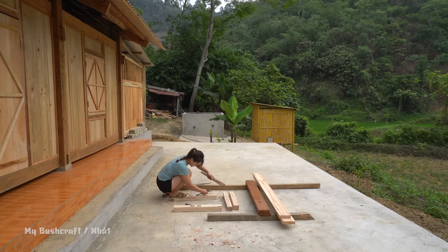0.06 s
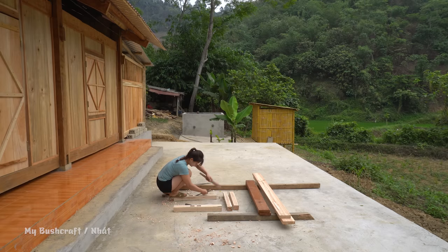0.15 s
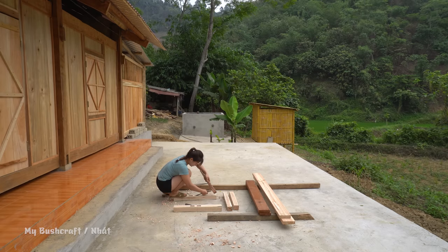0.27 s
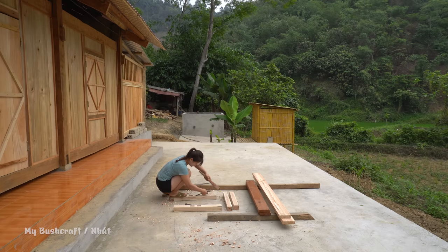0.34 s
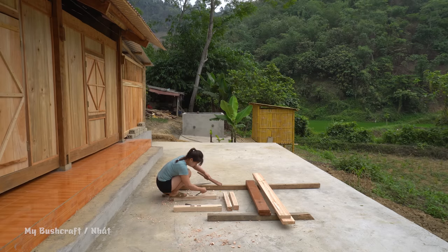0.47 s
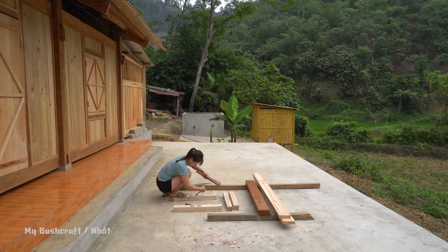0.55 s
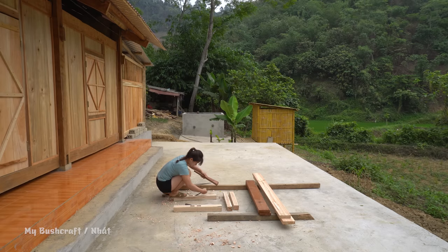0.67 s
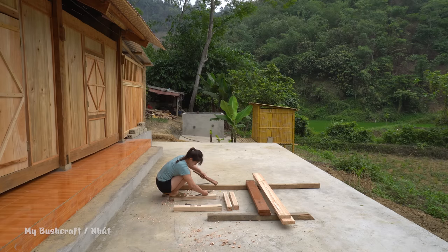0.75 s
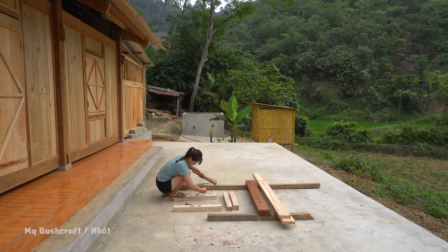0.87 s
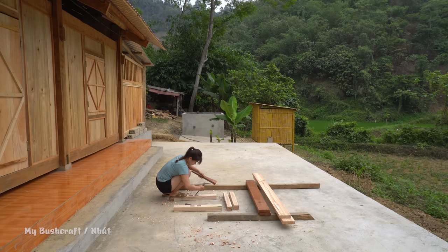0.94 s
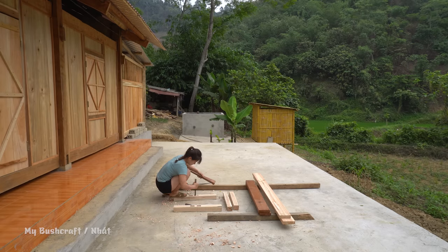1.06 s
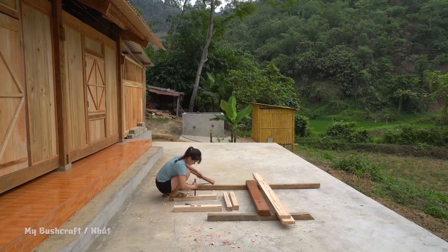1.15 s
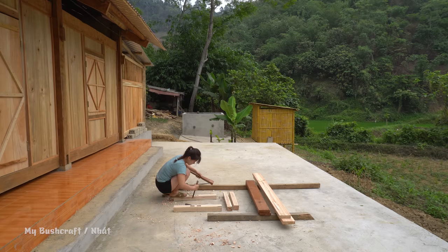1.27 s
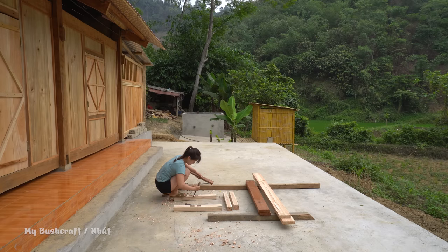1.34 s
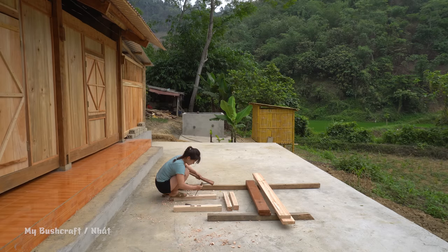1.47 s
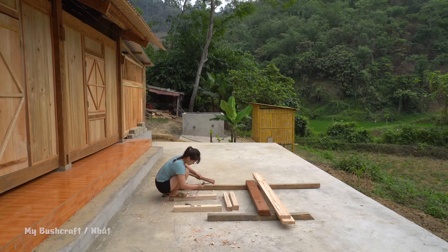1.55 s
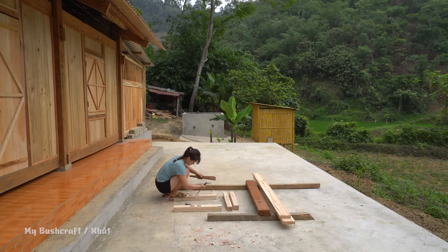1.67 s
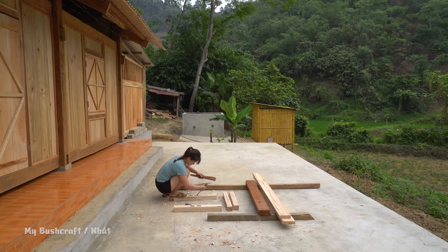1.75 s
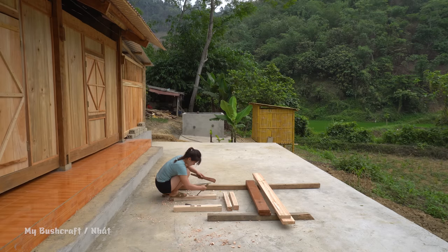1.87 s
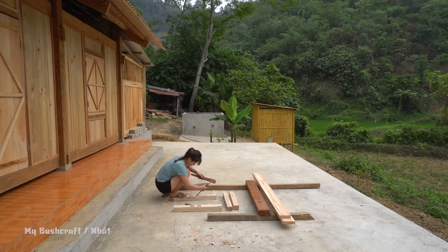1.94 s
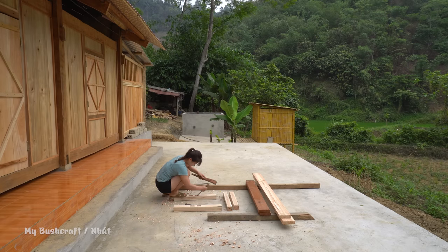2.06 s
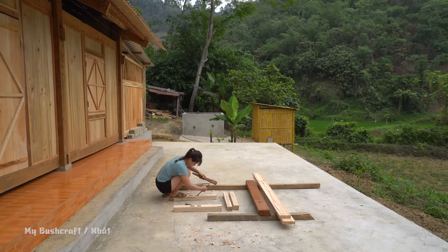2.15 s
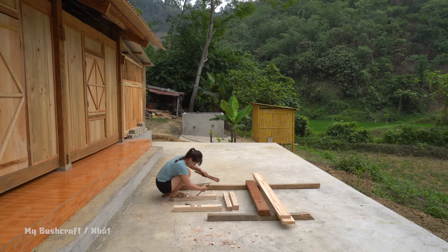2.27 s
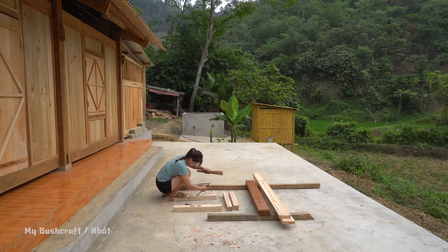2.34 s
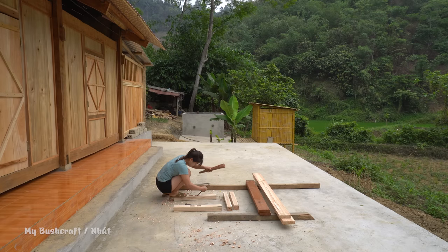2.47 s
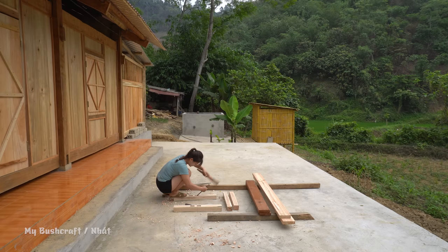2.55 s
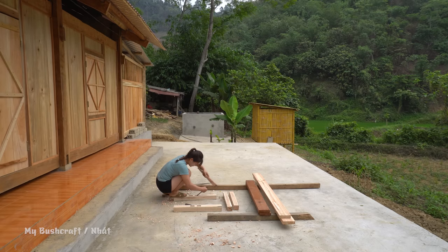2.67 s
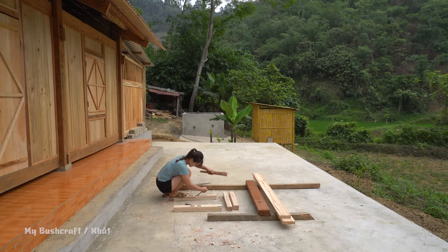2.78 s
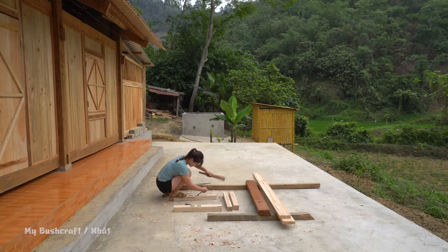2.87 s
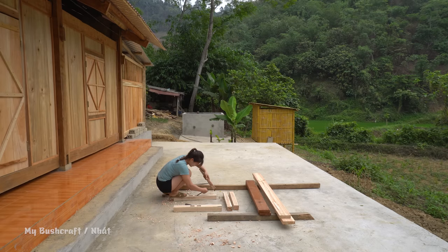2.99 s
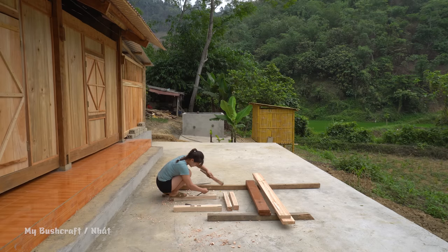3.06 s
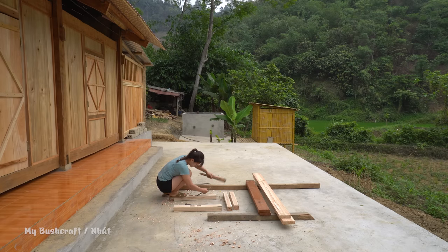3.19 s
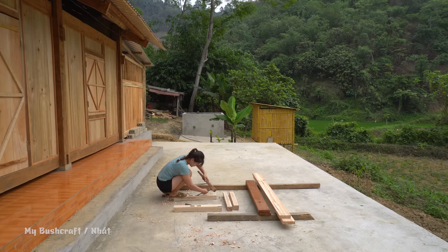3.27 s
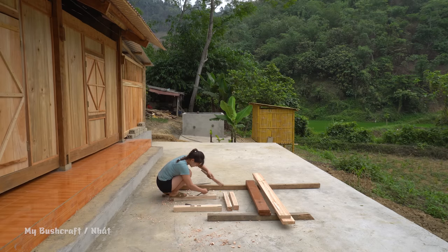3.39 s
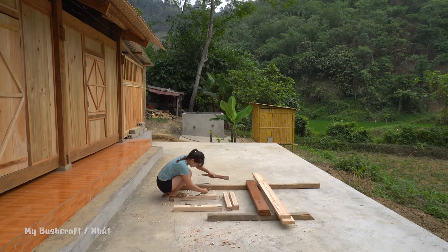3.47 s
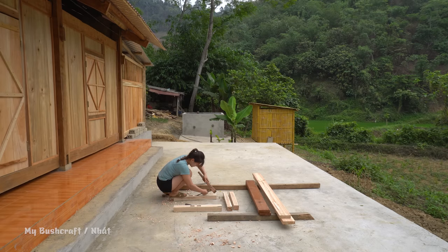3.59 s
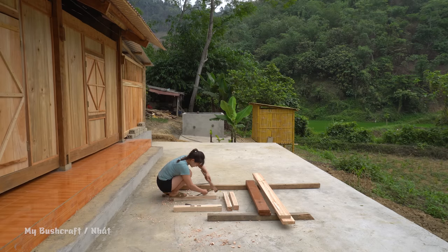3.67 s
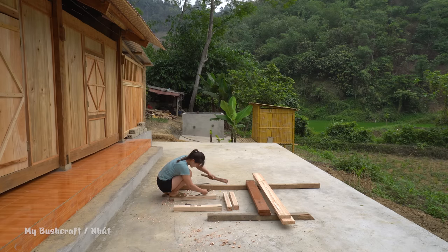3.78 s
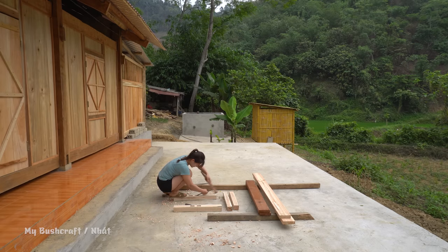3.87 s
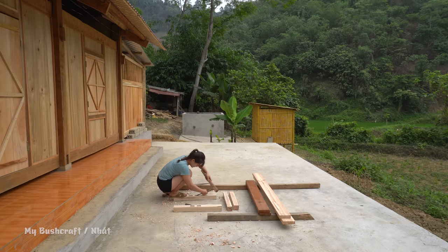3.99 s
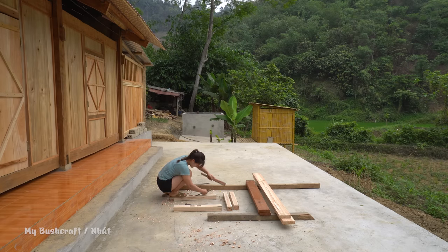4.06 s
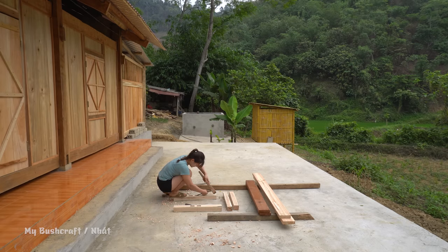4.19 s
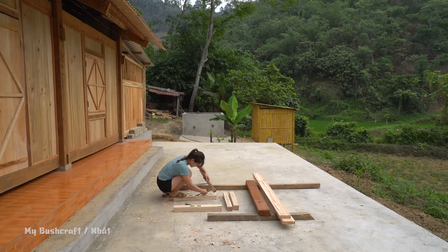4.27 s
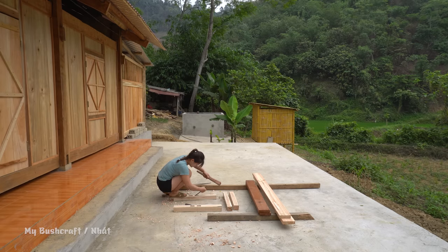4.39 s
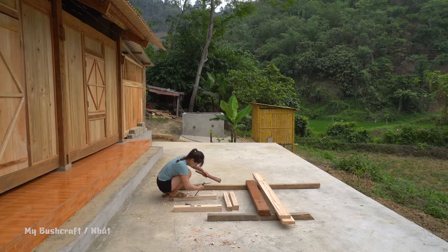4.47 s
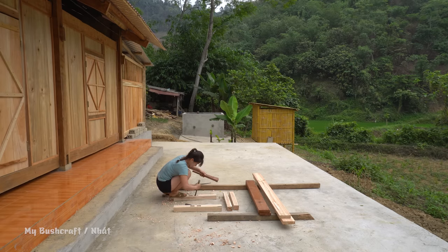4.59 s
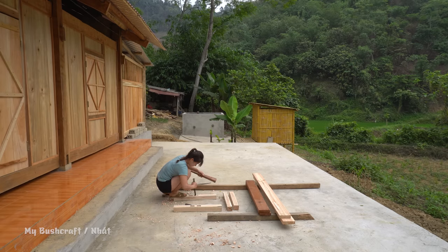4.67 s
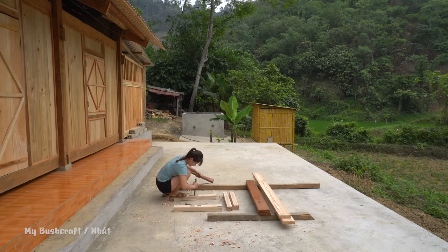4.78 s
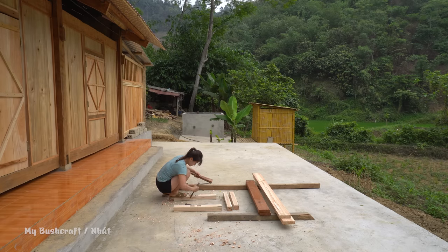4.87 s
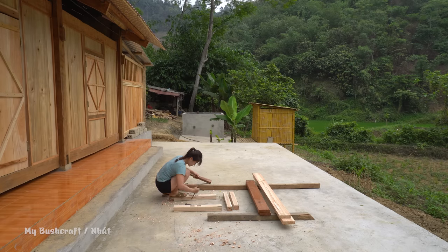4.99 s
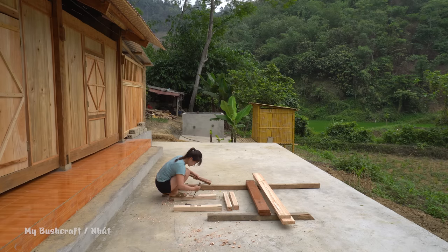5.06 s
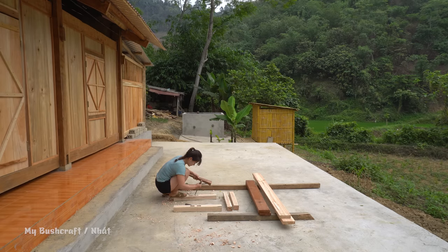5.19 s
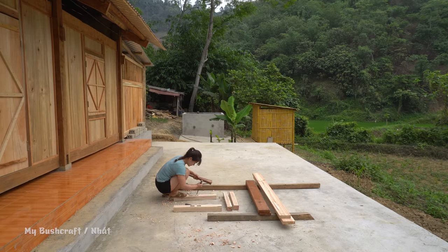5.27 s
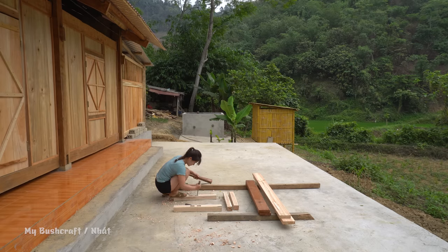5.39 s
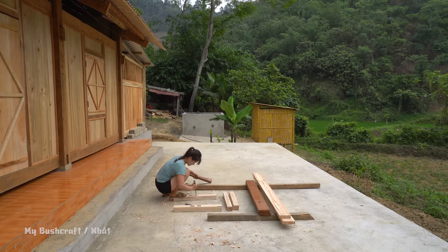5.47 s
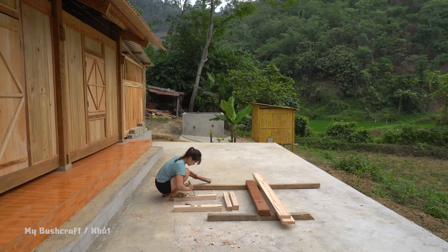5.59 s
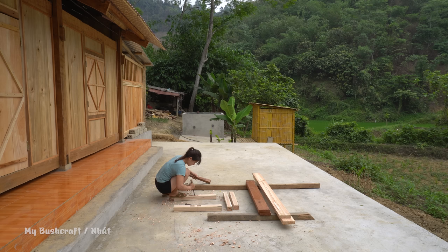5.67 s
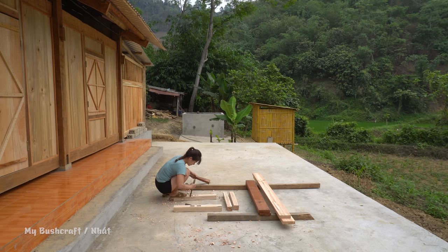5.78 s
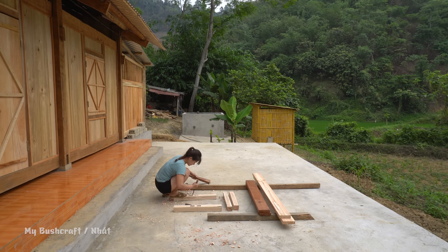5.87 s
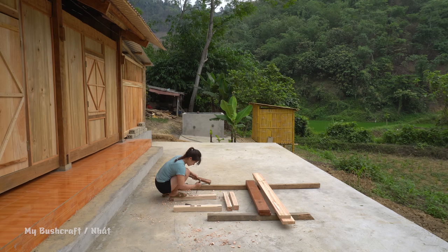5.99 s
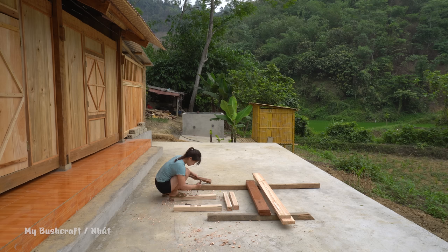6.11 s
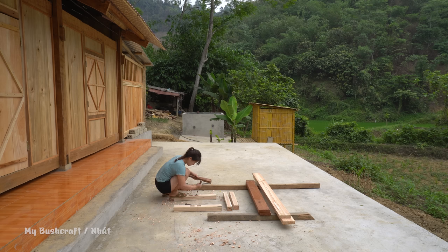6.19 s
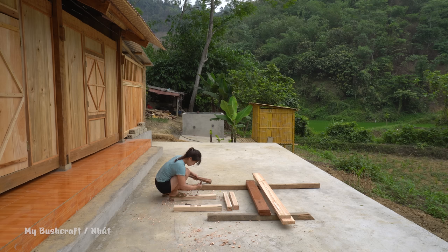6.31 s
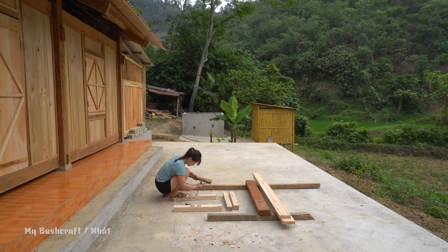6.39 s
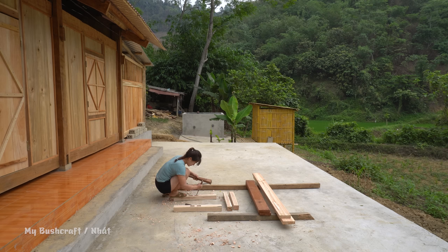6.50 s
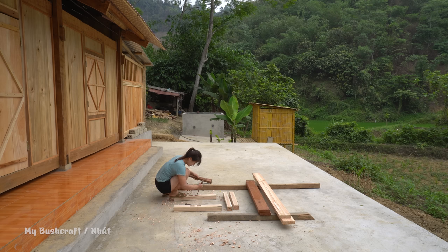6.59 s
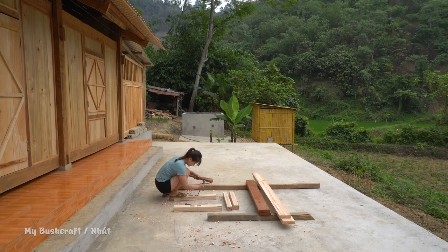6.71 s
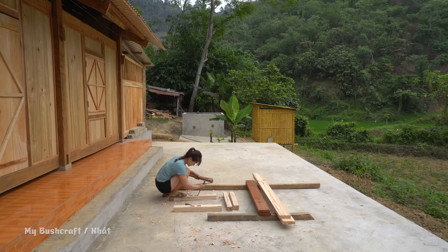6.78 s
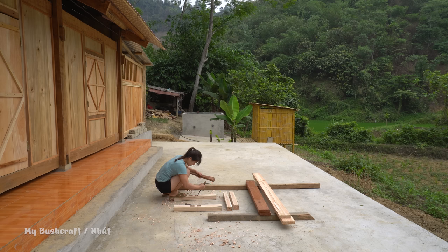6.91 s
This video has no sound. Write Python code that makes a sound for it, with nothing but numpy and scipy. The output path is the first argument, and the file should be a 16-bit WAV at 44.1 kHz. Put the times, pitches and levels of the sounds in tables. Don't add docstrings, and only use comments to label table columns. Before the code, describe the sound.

Bright woody chisel blows crack across a concrete yard, pausing for small knocks and ticks, then returning in a steady run over droning insects.

```python
import sys
import numpy as np
from scipy import signal
from scipy.io import wavfile
from scipy.ndimage import uniform_filter1d

SR = 44100
rng = np.random.default_rng(int(sys.argv[2]) if len(sys.argv) > 2 else 0)


def how_loud(loudness_db):
    steps = np.asarray(loudness_db, float) / 20
    return 10 ** steps


def int16_out(signal):
    q = np.round(np.clip(np.atleast_2d(signal).T, -1, 1) * 32767)
    wavfile.write(sys.argv[1], SR, q.astype(np.int16))


N = 306054
LEAD = 4410
FAINT_TOP_HZ = 15850

# start [s], low body of the beam [dB], bright crack [dB], far-wall echo [dB],
# contact time [ms].
BLOWS = [
    (-.0145, -9, -1, -9, 7.5),
    (0.286, -1.5, 4, -5.5, 5.4),
    (2.6723, -3, 3, -8.5, 4.4),
    (3.0198, 1, 3.5, -9, 5.9),
    (3.341, -1.5, 0, -7.5, 6.6),
    (3.665, 0.5, 3.5, -11, 9.8),
    (3.983, -2, -0.5, -10, 4.8),
    (4.2733, 1.5, -1, -8.5, 8.5),
]
# frequency [Hz], level [dB], decay time t60 [s].
BEAM_MODES = [(472, -4, 0.099), (662, -4.5, 0.05), (773, -5, 0.095), (1109, 1.5, 0.026), (1358, 1.5, 0.035),
              (1495, -2, 0.076), (1680, -1, 0.049), (2050, 1, 0.033), (2350, 0, 0.014), (2594, 0.5, 0.022),
              (2960, -6.5, 0.049), (3620, -9.5, 0.027)]
# frequency [Hz], level [dB per Hz].
CRACK_SPECTRUM = [(1500, -26), (3000, 0), (4600, -12), (5700, -11.5), (7300, -17), (8600, -15.5),
                  (12000, -24), (16000, -27)]
# frequency [Hz], gain [dB].
WALL_GAIN = [(300, -42), (1500, -29), (2100, 3.5), (2700, 7), (3500, -13), (4900, 2.5), (8400, -3.5),
             (16000, -4)]
# frequency [Hz], decay time t60 [s].
YARD_T60 = [(300, 1), (800, 0.53), (2000, 0.28), (5500, 0.092), (12000, 0.073)]
# delay [ms], left level [dB], right level [dB].
NEAR_REFLECTIONS = [
    (11.98, -3.5, -43),
    (19.13, -13, -13),
    (25.15, -25, -28),
]
# frequency [Hz], level [dB per Hz].
FIELD_SPECTRUM = [(150, -17.5), (300, -27.5), (480, -5.5), (800, -5.5), (1150, -5.5), (1500, 2), (1900, -2),
                  (2500, -4.5), (3800, -11.5), (8000, -14), (16000, -24)]
# frequency [Hz], left-right likeness [0 to 1].
FIELD_COHERENCE = [(300, 0.98), (800, .93), (1300, 0.99), (4000, 0.13), (8000, 0.059)]

# time [s], strokes per second [1/s].
STROKE_RATE = [(0.0, 47.297), (1.0, 47.216), (2.0, 47.157), (3.0, 47.168), (4.0, 47.036), (5.0, 47.037),
               (6.0, 46.872), (7.0, 46.891)]
# time into the stroke [ms], left strength [ratio], right strength [ratio].
RIB_POPS = [(-.04, .97, .9), (3.45, .38, .93), (4.67, .75, .85), (8.19, .5, .85)]
# delay [ms], left share [ratio], right share [ratio].
POP_RETURNS = [(0, 1, 1), (1.44, .4, .38), (5.04, .27, .26), (6.14, .26, .24), (11.12, .3, .17)]
# frequency [Hz], width [Hz], level [dB].
TYMBAL_MODES = [(3417, 848, 6), (2852, 784, 2), (4360, 710, -13.5), (4656, 420, -10)]
# time [s], level [dB], left minus right [dB].
CICADA_LEVEL = [(0.0, -34, 1), (0.17, -30.5, 0), (0.25, -31.5, 0.5), (2.49, -32.5, -0.2),
                (2.65, -33.5, -0.4), (3.88, -34.5, 0.8), (4.56, -33.5, -0.5), (5.37, -36, -0.5),
                (5.89, -35, -1), (6.94, -36, -0.5)]
# centre [Hz], width [Hz], level [dB].
CHORUS_BANDS = [(1223.6, 247, 1), (1355, 246, -9), (2890, 900, -1.5), (1547, 700, -9.5)]
# frequency [Hz], level [dB per Hz].
WIND_SPECTRUM = [(12, -12), (24, -2), (33, 5), (42, -1.5), (60, -12.5), (100, -10), (140, -14), (200, -23),
                 (400, -48)]
# time [s], level [dB].
BREEZE_LEVEL = [(0, -50), (1.0, -49), (1.8, -48), (2.45, -48.5), (3.45, -52), (3.8, -56.5), (4.35, -63),
                (4.65, -55), (5.2, -49.5), (5.7, -53.5), (6.0, -40), (6.25, -50.5), (6.94, -48)]
# frequency [Hz], level [dB per Hz].
HISS_SPECTRUM = [(100, 2), (300, 6.5), (800, 6.5), (2100, 9.5), (4000, 11), (4900, 10.5), (5300, 4.5),
                 (6500, 0.5), (8300, 3), (10000, -3.5), (15500, -8.5)]
# frequency [Hz], level [dB per Hz].
RUSTLE_SPECTRUM = [(3000, -30), (6000, -12), (9000, -1), (12000, 2), (15500, -4)]

# start [s], peak [dB].
TICKS = [(0.1224, -35), (0.8194, -44), (0.9294, -39), (1.245, -34.5), (1.2994, -39), (1.4207, -29),
         (1.441, -29.5), (2.5194, -39), (2.9916, -34), (4.1574, -38), (4.5885, -33), (4.8269, -37),
         (4.8913, -22), (4.9394, -39), (5.5927, -32), (5.6994, -41), (5.777, -28), (5.9249, -46),
         (5.982, -34), (6.5794, -41)]
# start [s], peak [dB], low mode [Hz],
# high mode [Hz], high mode level [dB].
KNOCKS = [(1.125, -21, 394, 794, -4), (1.26, -26, 222, 700, -11), (2.088, -25.5, 332, 740, -9),
          (2.679, -37, 118, 120, 11), (4.827, -38.5, 511, 903, 2), (4.894, -37, 519, 940, 4),
          (5.442, -26.5, 330, 490, -4), (5.551, -41, 510, 522, -5), (5.585, -33.5, 260, 500, 1),
          (5.601, -30.5, 246, 870, -5), (5.777, -37.5, 229, 581, 2), (6.142, -41, 61, 144, -14),
          (6.319, -32.5, 544, 549, -5), (6.554, -38.5, 61.9, 123, -1), (6.647, -39, 84, 120, -2)]
# start [s], peak [dB], pitch [Hz], decay time t60 [s].
CREAKS = [
    (1.6222, -37.5, 2050, 0.1),
    (1.94, -41, 1680, 0.083),
    (2.196, -36.5, 1790, 0.19),
    (4.501, -37, 1670, 0.086),
    (4.6731, -33, 1440, 0.078),
    (5.9904, -43, 1820, 0.12),
    (6.785, -40.5, 1770, 0.23),
]
# time into the syllable [s], pitch [Hz], level [dB].
SLIDE_SHAPE = [(0, 6970, -7), (.006, 5670, -7), (.016, 4950, -1.5), (.024, 4600, -12), (.036, 3900, -5)]
# time into the syllable [s], pitch [Hz], level [dB].
ARCH_SHAPE = [(0, 5600, -16), (.007, 6400, -5), (.015, 6650, -2.5), (.024, 6460, -3.5), (.038, 5700, -2),
              (.068, 4000, -5)]
# start [s], level [dB], pitch factor [ratio].
SLIDE_CALLS = [(1.493, -39, 0.94), (1.84, -38.5, 0.92), (2.213, -38, 0.96), (4.63, -44, 0.91),
               (6.171, -42, 0.94), (6.521, -41, 0.9), (6.879, -38, 0.95)]
# start [s], level [dB], pitch factor [ratio].
ARCH_CALLS = [(1.603, -45.5, 0.94), (1.952, -44.5, 0.98), (2.326, -42.5, 0.98), (4.733, -46, 0.94),
              (6.274, -47.5, 0.93), (6.631, -45.5, 0.95)]
# start [s], length [s], pitch [Hz], level [dB].
COOS = [
    (1.778, 0.15, 572, -62),
    (2.03, 0.027, 764, -54),
    (2.079, .075, 760, -40.5),
    (2.15, 0.14, 752, -54.5),
]


def unit_rms(x):
    return x / np.sqrt(np.mean(x ** 2) + 1e-20)


def read(points, hz):
    f, value = np.transpose(points)
    return np.interp(np.log(hz + 1), np.log(f + 1), value)


def silence():
    return np.zeros((2, N + LEAD))


def add(mix, s, sound):
    part = mix[..., LEAD + round(s * SR):][..., :sound.shape[-1]]
    part += sound[..., :part.shape[-1]]


def colour(x, points):
    log_gain = np.log(how_loud(read(points, abs(np.fft.fftfreq(2048, 1 / SR)))))
    taps = np.fft.ifft(np.exp(np.conj(signal.hilbert(log_gain)))).real[:1024]
    taps = taps.reshape((1,) * (x.ndim - 1) + (-1,))
    return signal.oaconvolve(x, taps, axes=-1)[..., :x.shape[-1]]


def resonate(x, hz, width):
    b, a = signal.iirpeak(hz, hz / width, SR)
    return signal.lfilter(b, a, signal.lfilter(b, a, x))


def partly_alike(left, other, same):
    return np.array([left, same * left + np.sqrt(1 - same ** 2) * other])


def field(level_db, chance):
    hz, t, z = signal.stft(chance, SR, nperseg=256)
    z = partly_alike(z[0], z[1], np.clip(read(FIELD_COHERENCE, hz), 0, 1)[:, None])
    uneven = uniform_filter1d(uniform_filter1d(z[1].imag, size=2, axis=0), size=6, axis=1)
    z *= how_loud(2.8 * np.clip(unit_rms(uneven), -2, 2))
    z *= ((hz > 0) & (hz < FAINT_TOP_HZ))[:, None]
    decay_db = read(FIELD_SPECTRUM, hz)[:, None] - 60 * t / read(YARD_T60, hz)[:, None]
    tail = signal.istft(z * how_loud(decay_db), SR, nperseg=256)[1]
    rise = np.clip(np.arange(tail.shape[1]) / SR / .009, 0, 1) ** 2
    return how_loud(level_db) * rise * tail / tail[:, :1000].std()


def blow(peak_db, low_db, crack_db, wall_db, contact_ms, chance):
    t = np.arange(4096) / SR
    contact_s = contact_ms / 1000
    contact = np.clip(t / 0.00009, 0, 1) * np.exp(-t / 0.011) / (1 + np.exp((t - contact_s) / 0.0001))
    hz, db, t60 = np.transpose(BEAM_MODES)[:, :, None]
    db = db + low_db * (hz < 900) + 2.5 * (hz > 2200)
    sign = (-1) ** np.arange(len(hz))[:, None]
    beam = (how_loud(db - 60 * t / t60) * np.sin(2 * np.pi * hz * t) * sign).sum(0)

    jolts = 0.04 * contact * chance[0] ** 2 * np.sign(chance[0])
    jolts[[8, round(contact_ms * SR / 1000) - 40]] += [1., -.6]
    body = signal.fftconvolve(beam, jolts)[:len(t)]
    body *= .4 + .6 / (1 + np.exp((t - contact_s) / .0004))
    crack = colour((chance[1] * contact + 1.13 * jolts) * np.exp(-t / 0.0063), CRACK_SPECTRUM)
    body = body / abs(body).max()
    crack = how_loud(crack_db - 7.5) * crack / abs(crack).max()
    direct = how_loud(peak_db) * (body * how_loud([[0], [.6]]) + crack * how_loud([[1.5], [-2]]))
    echo = how_loud(wall_db) * colour(direct * np.exp(-t / 0.0071), WALL_GAIN)
    return direct, echo


def mallet():
    blow_db, scatter_db, wall_s = -5, -25.5, .0612
    out = silence()
    for (s, *how), chance in zip(BLOWS, rng.standard_normal((len(BLOWS), 2, 20000))):
        direct, echo = blow(blow_db, *how, chance[:, -4096:])
        add(out, s, direct)
        for ms, *db in NEAR_REFLECTIONS:
            add(out, s + ms / 1000, colour(direct, FIELD_SPECTRUM) * how_loud(db)[:, None])
        add(out, s + wall_s, echo)
        add(out, s, field(scatter_db, chance))
    return out


def cicada(wobble_db=1.0):
    t = np.arange(N) / SR
    strokes = np.cumsum(np.interp(t, *np.transpose(STROKE_RATE))) / SR - .44
    start = np.interp(np.arange(int(strokes[-1]) + 1), strokes, t)[:, None]
    pops = [(ms + late, left * a, right * b) for ms, left, right in RIB_POPS for late, a, b in POP_RETURNS]
    ms, *strength = np.transpose(pops)
    chance = rng.standard_normal((len(start), 3, len(ms)))
    jitter_s = 5e-6 * chance[:, 0] + 1e-5 * chance[:, 2, :1]
    slowing = 47.2 / np.interp(start, *np.transpose(STROKE_RATE))
    at = np.clip((start + slowing * ms / 1000 + jitter_s) * SR, 0, N - 3).ravel()
    size = (np.array(strength)[:, None] * how_loud(wobble_db * chance[:, 1])).reshape(2, -1)
    at = at + np.array([[0], [.7]])

    whole, part = at.astype(int), at % 1
    train = np.array([np.bincount(w, s * (1 - p), N) + np.bincount(w + 1, s * p, N)
                      for w, p, s in zip(whole, part, size)])
    ring = sum((-1) ** k * how_loud(db) * resonate(train, hz, width)
               for k, (hz, width, db) in enumerate(TYMBAL_MODES))
    s, db, pan_db = np.transpose(CICADA_LEVEL)
    return unit_rms(ring) * how_loud(np.interp(t, s, db) + np.interp(t, s, pan_db) * np.array([[.5], [-.5]]))


def swell(top_hz):
    t = np.arange(0, N + 441, 441) / SR
    hz = np.geomspace(top_hz / 8, top_hz, num=16)[:, None]
    slow = (np.sin(2 * np.pi * (hz * t + rng.random(hz.shape))) / np.sqrt(hz)).sum(0)
    return np.interp(np.arange(N) / SR, t, unit_rms(slow))


def patchy(shape_db, level_db, same, patchy_db, flicker_db, size=1024):
    frames, hz = N * 4 // size + 5, np.fft.rfftfreq(size, 1 / SR)
    a, b, c, d, patches = rng.standard_normal((frames, len(hz), 5)).T
    patches = unit_rms(uniform_filter1d(uniform_filter1d(patches, 12, 0), 10, 1))
    flicker = unit_rms(uniform_filter1d(rng.standard_normal(frames), 4))
    z = partly_alike(a + 1j * b, c + 1j * d, np.clip(same, 0, 1))
    z *= how_loud(shape_db(hz)[:, None] + patchy_db * patches + flicker_db * flicker)
    noise = signal.istft(z, nperseg=size, noverlap=size * 3 // 4)[1][:, :N]
    return how_loud(level_db) * unit_rms(noise)


def chorus_shape(hz):
    return 20 * np.log10(sum(how_loud(db) / (1 + (2 * (hz - f) / w) ** 4) for f, w, db in CHORUS_BANDS))


def air():
    t = np.arange(N) / SR
    wind_db = np.interp(t, *np.transpose(BREEZE_LEVEL))
    chorus_db = -40.5 - 0.18 * t + .8 * swell(top_hz=2.5)
    hiss_db = -58 + 0.04 * (wind_db - wind_db.mean()) + .9 * swell(top_hz=3)
    chorus = patchy(chorus_shape, chorus_db + 4.5, same=0.33, patchy_db=1.5, flicker_db=0.5)
    wind = patchy(lambda hz: read(WIND_SPECTRUM, hz), wind_db, same=.97, patchy_db=1.2, flicker_db=.8, size=2048)
    hiss = patchy(lambda hz: read(HISS_SPECTRUM, hz), hiss_db + 12.0,
                  same=0.28, patchy_db=1.5, flicker_db=0.4, size=512)
    rustle = patchy(lambda hz: read(RUSTLE_SPECTRUM, hz), hiss_db - 3, same=.6, patchy_db=1.5, flicker_db=3.5)
    return chorus * how_loud([[-3], [2.2]]) + wind + (hiss + rustle) * how_loud([[.6], [-.6]])


def ticks():
    out, t = silence(), np.arange(6000) / SR
    highpass = signal.butter(2, 5900, "high", fs=SR)
    for (s, db), noise in zip(TICKS, rng.standard_normal((len(TICKS), 2, len(t)))):
        puff = signal.lfilter(*highpass, noise[:1] + .5 * noise)
        envelope = how_loud(db - 6.5 - 60 * t / .04) * (1 - np.exp(-t / 0.00082))
        add(out, s, envelope * puff * how_loud([[1], [-1]]))
    return out


def knocks():
    out, t = silence(), np.arange(6000) / SR
    for (s, db, low_hz, high_hz, high_db), noise in zip(KNOCKS, rng.standard_normal((len(KNOCKS), len(t)))):
        t60 = 0.011 + 3.7 / low_hz
        ring = np.sin(2 * np.pi * low_hz * t) + how_loud(high_db) * np.sin(2 * np.pi * high_hz * t)
        ring += 0.69 * unit_rms(resonate(noise, 1.09 * low_hz, 1.1 * low_hz))
        add(out, s, how_loud(db + 2.5 - 60 * t / t60) * ring * (1 - np.exp(-t / 0.0034)))
    return out


def creaks():
    out, t = silence(), np.arange(6000) / SR
    for (s, db, hz, t60), noise in zip(CREAKS, rng.standard_normal((len(CREAKS), len(t)))):
        envelope = how_loud(db + 3 - 60 * t / t60) * (1 - np.exp(-t / 0.005))
        add(out, s, envelope * unit_rms(resonate(noise, hz, 430)))
    return out


def whistle(rows):
    s, hz, db = np.transpose(rows)
    t = np.arange(s[0], s[-1], 1 / SR)
    tone = np.sin(2 * np.pi * np.cumsum(np.interp(t, s, hz)) / SR)
    return np.sqrt(2) * how_loud(np.interp(t, s, db)) * tone * signal.windows.tukey(len(t), .2)


def chirps():
    out = np.zeros(N + LEAD)
    for shape, calls in ((SLIDE_SHAPE, SLIDE_CALLS), (ARCH_SHAPE, ARCH_CALLS)):
        for s, db, pitch in calls:
            chirp = how_loud(db) * whistle(np.multiply(shape, [1, pitch, 1]))
            husk = unit_rms(uniform_filter1d(rng.standard_normal(len(chirp)), 130))
            chirp = chirp * how_loud(2 * husk)
            add(out, s, chirp)
            add(out, s + .011, how_loud(-8) * chirp)
    return out


def coo(length, hz, db):
    hold = 0.46
    t = np.arange(0, length, .004)
    spent = np.maximum(t / length - hold, 0) / (1 - hold)
    rise_db = -15 * np.maximum(1 - t / .012, 0)
    return whistle(np.transpose([t, hz * (1 - 0.078 * spent), db + rise_db - 12 * spent]))


def birds():
    out = chirps()
    trees = rng.standard_normal((2, 6000)) * how_loud(-60 * np.arange(6000) / SR / 0.36)
    smear = signal.oaconvolve(out[None], trees / np.linalg.norm(trees[0]), axes=1)[:, :len(out)]
    for s, *note in COOS:
        add(out, s, coo(*note))
    return out * how_loud([[.8], [-.8]]) + how_loud(1) * smear


def lowpass(x, hz):
    return signal.oaconvolve(x, signal.firwin(511, hz, window=("kaiser", 9), fs=SR)[None], "same")


def scene():
    blows = mallet()[:, LEAD:]
    faint = cicada() + air() + (ticks() + knocks() + creaks() + birds())[:, LEAD:]
    return lowpass(blows, 16600) + lowpass(faint, FAINT_TOP_HZ)


def roll_off(x):
    return signal.sosfilt(signal.butter(12, 16830, fs=SR, output="sos"), x)


def record(dry):
    power_db = 10 * np.log10(abs(uniform_filter1d((dry ** 2).mean(0), 120, origin=59)) + 1e-12)
    fall = np.arange(N) * 136.0 / SR
    held_db = np.maximum.accumulate(power_db + fall) - fall
    over_db = np.maximum(held_db + 21, 0)
    ducked = dry / how_loud(0.33 * uniform_filter1d(over_db, 150, origin=74))
    return roll_off(ducked)


dry = scene()
out = record(dry)
int16_out(out)
```